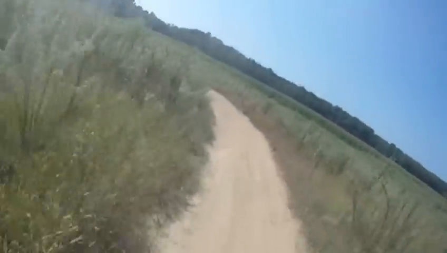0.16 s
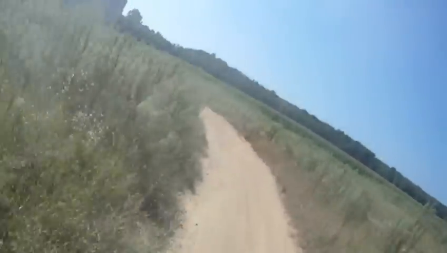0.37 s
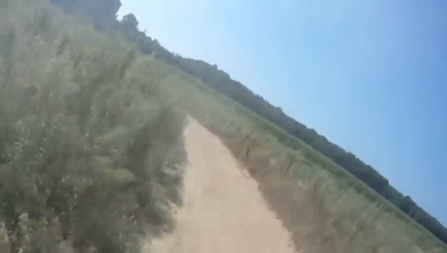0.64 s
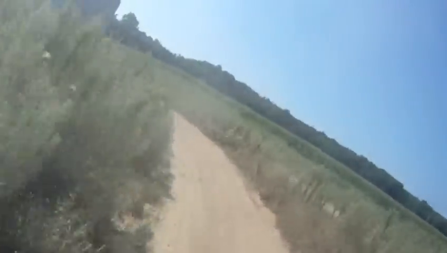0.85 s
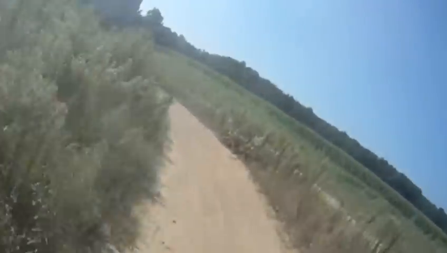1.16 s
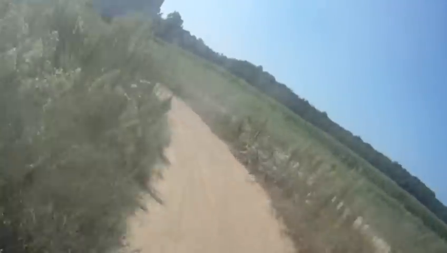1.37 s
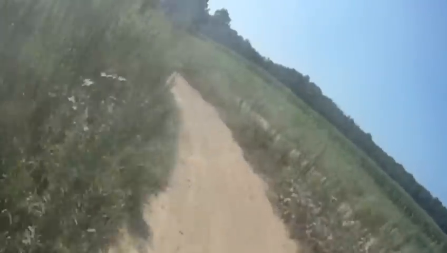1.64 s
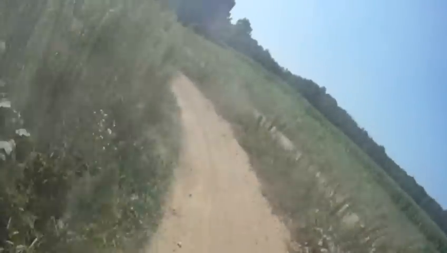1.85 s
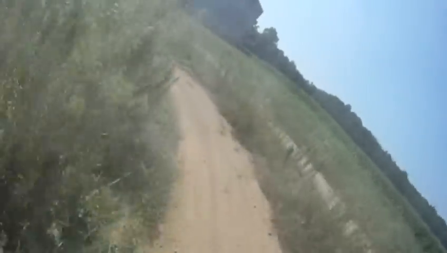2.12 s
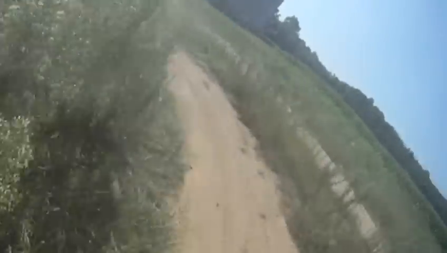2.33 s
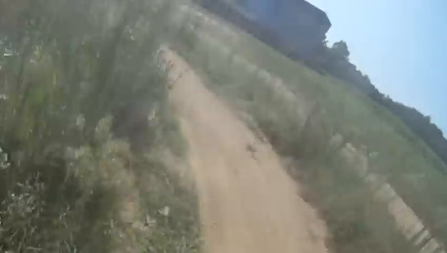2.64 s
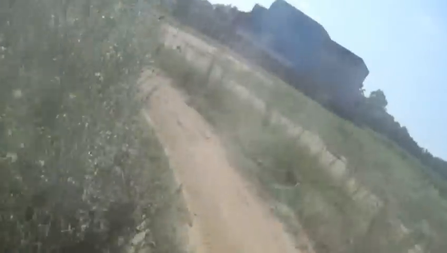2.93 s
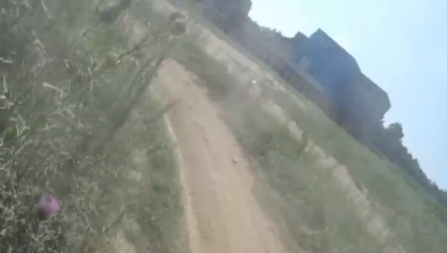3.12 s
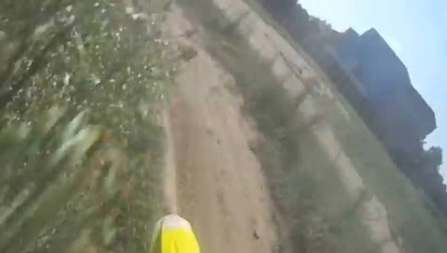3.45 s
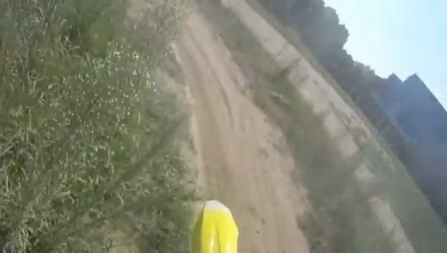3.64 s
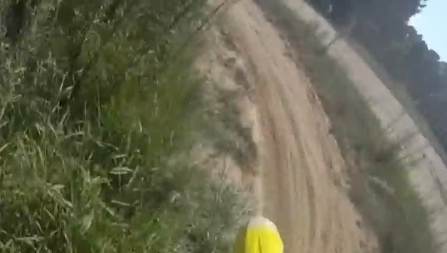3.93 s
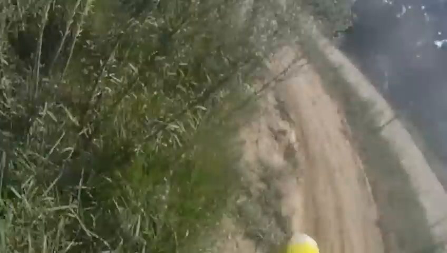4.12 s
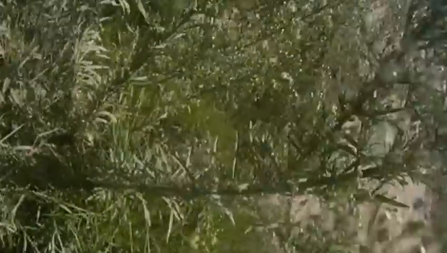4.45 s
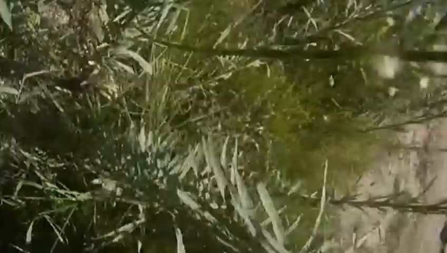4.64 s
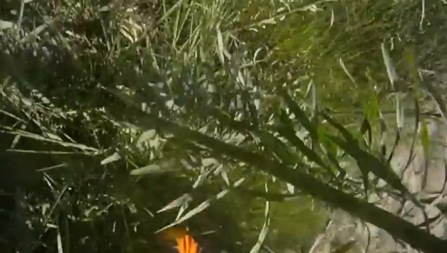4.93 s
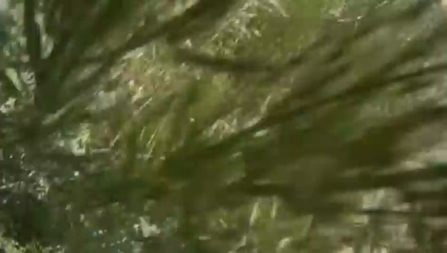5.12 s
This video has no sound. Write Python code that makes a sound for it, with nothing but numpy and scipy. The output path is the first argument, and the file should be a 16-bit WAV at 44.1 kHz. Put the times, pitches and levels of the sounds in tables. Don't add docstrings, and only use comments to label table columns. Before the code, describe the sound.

Boxy wind roar and a dropping single-cylinder engine give way to quiet idling, sparse ticks, then loud clipped cracks and leafy scratching up close.

```python
import sys
import numpy as np
from scipy import signal
from scipy.io import wavfile
from scipy.ndimage import uniform_filter1d

SR = 44100
rng = np.random.default_rng(int(sys.argv[2]) if len(sys.argv) > 2 else 0)


def invert_db(x):
    u = np.asarray(x, float) / 20
    return 10 ** u


def unload_audio(sound):
    columns = np.transpose(np.atleast_2d(sound))
    steps = np.round(np.clip(columns, -1, 1) * 32767)
    wavfile.write(sys.argv[1], SR, steps.astype(np.int16))


N = 232936


def level(x, db):
    return x * invert_db(db) / np.sqrt(np.mean(x ** 2))


def curves(table):
    s, *columns = np.transpose(table)
    return [np.interp(np.arange(N) / SR, s, c) for c in columns]


def band(x, hz, width_hz):
    return signal.lfilter(*signal.iirpeak(hz, hz / width_hz, fs=SR), x)


def steep(x, hz, width_hz):
    return band(band(x, hz, width_hz), hz, width_hz)


def walk(rate):
    k = int(SR / rate)
    held = np.repeat(rng.standard_normal(N // k + 1), k)
    return 1.16 * uniform_filter1d(uniform_filter1d(held, k), k)[:N]


def swells(table, base_db):
    t = np.arange(N) / SR
    power = invert_db(2 * base_db)
    for s, db, half in table:
        power = power + invert_db(2 * db) * np.cos(np.pi / 2 * np.clip((t - s) / half, -1, 1)) ** 4
    return np.sqrt(power)


def add(out, s, piece):
    i = int(s * SR)
    out[i:i + len(piece)] += piece[:N - i]


def case(x, flicker_db, treble=1):
    # (frequency [Hz], width [Hz], level [dB])
    case_modes = [(287, 320, -10), (831, 58, -1), (1078, 103, -0.5), (1370, 170, -6.5), (1640, 97, -6.5),
                  (2056, 336, 5.5), (2490, 330, -6.5), (2690, 102, 2), (3165, 160, -15), (3460, 140, -3),
                  (3627, 510, -13.5), (4340, 390, -17), (5090, 450, -15), (5480, 390, -14.5)]
    out = 0
    for k, (hz, width_hz, db) in enumerate(case_modes):
        gain = (-1) ** k * invert_db(db + flicker_db * walk(25.11))
        out = out + gain * steep(x, hz, 1.98 * width_hz) * (treble if hz > 3000 else 1)
    return out


def engine():
    # (time [s], crank speed [Hz], fourth order level [dB])
    crank = [(0.0, 57.7, -36), (0.146, 58.13, -41), (0.264, 49.53, -34), (0.48, 51.1, -35),
             (0.62, 50.27, -34.5), (0.878, 43.2, -38), (1.036, 46.6, -36), (1.17, 40.4, -37),
             (1.27, 37.8, -37), (1.34, 36, -48), (1.62, 31.07, -50), (2.43, 30.14, -47.5),
             (3.1, 28.96, -51.5), (4.3, 29.84, -61), (5.28, 30.4, -58)]
    # (order [per turn], level [dB])
    rolling_orders = [(1, -34), (2, -3), (3, -7), (4, 1.5), (5, -9), (6, -11), (7, -29), (8, -26), (9, -22),
                      (10, -15), (11, -14.5)]
    # (order [per turn], level [dB])
    idle_orders = [(1, -4), (2, -4), (3, -3), (4, -4), (5, -5), (6, -8), (7, -11), (8, -10), (9, -13),
                   (10, -8), (11, -8)]
    hz, db = curves(crank)
    turns = np.cumsum(hz * (1 + 0.0061 * walk(11))) / SR
    rolling = np.clip((hz - 32) / 6, 0, 1)
    out = 0
    for (k, fast_db), (_, slow_db) in zip(rolling_orders, idle_orders):
        pattern_db = rolling * fast_db + (2 - rolling) * (slow_db + 3)
        gain = invert_db(db + 2 + pattern_db + 1.3 * walk(5.47))
        out = out + gain * np.sin(2 * np.pi * (k * turns + rng.random()))
    return out, turns


def head_wind():
    # (time [s], level [dB])
    wind_curve = [(0.0, -26.5), (0.24, -28), (0.65, -28), (1.01, -29), (1.37, -33.5), (1.8, -39.5),
                  (2.11, -40), (2.43, -43), (2.76, -46), (2.81, -37), (2.93, -42.5), (3.2, -48),
                  (3.5, -45.5), (4.5, -46), (5.28, -45)]
    return curves(wind_curve)[0]


def rush(turns, wind_db):
    shake = 1 + 0.5 * np.exp(-(turns % 1) / 0.067)
    turbulence = shake * invert_db(1.27 * walk(150)) * rng.standard_normal(N)
    air = case(turbulence, flicker_db=0.84, treble=invert_db(0.13 * (wind_db + 56.0)))
    start = np.sqrt(np.mean(air[:SR] ** 2))
    return invert_db(wind_db + 3.5) * air / start


def branches():
    # (time [s], peak [dB], contact [s], ringing [Hz], treble [dB])
    lashes = [(2.779, -4, 0.0077, 2040, -37), (2.784, -4.5, 0.0084, 2040, -40),
              (2.786, -13, 0.004, 3490, -23), (2.786, -24, 0.0076, 1180, -26),
              (3.299, 10.5, .0038, 2104, -27), (3.302, .7, .003, 1600, -21),
              (3.5695, 3.5, 0.0039, 2340, -33), (3.575, -1.5, .004, 2300, -15),
              (3.572, -4, 0.0025, 1963, -16.5), (3.577, 6, 0.0076, 2090, -12),
              (3.579, -5.5, 0.0057, 5130, -23), (3.58, -3.5, 0.0066, 3200, -7),
              (4.588, -19, 0.012, 3750, -12), (4.629, -2.5, .0035, 954.1, -5),
              (4.762, -10, .0047, 2720, -17), (4.786, 8, 0.0026, 2040, -39), (4.786, -2, 0.0032, 3430, -22),
              (5.122, -3, 0.007, 1136, -40), (5.122, 3.5, 0.0054, 1920, -22),
              (5.16, -7.5, .012, 2170, -7.5), (5.173, -17.5, 0.0092, 2730, 8.5),
              (5.181, -9, .004, 1900, -15), (5.1845, 5, .0031, 1810, -13), (5.193, -5.5, 0.0076, 2080, -10)]
    return strikes([(*hit, -29.5) for hit in lashes])


def twigs():
    # (time [s], peak [dB])
    slaps = [(3.314, -7), (3.32, -19), (3.586, -15), (4.602, -6), (4.607, -4), (4.614, -11), (4.622, -9),
             (4.642, -11), (4.657, -11), (4.67, -12), (4.691, -13), (4.75, -18), (4.772, -9), (4.803, -9),
             (4.821, -8), (4.83, 3), (4.846, -13), (4.629, -3.5), (5.207, -14), (5.214, -10.5),
             (5.229, -13), (5.243, -11), (5.26, -2.5), (5.269, -1.5), (5.273, -4)]
    slap_contact = .0042, 2070, -16.5, -30
    return strikes([(*hit, *slap_contact) for hit in slaps])


def stems():
    # (time [s], peak [dB])
    wipes = [
        (2.79, -22),
        (3.322, -16),
        (4.373, -18),
        (4.871, -10),
        (4.91, -19),
        (4.944, -8),
        (4.985, -23),
    ]
    wipe_contact = 0, 2000, -24.5, -35
    return strikes([(*hit, *wipe_contact) for hit in wipes])


def grass_heads():
    # (time [s], peak [dB], ringing [Hz])
    ticks = [(1.95, -26, 2050), (1.962, -27, 2000), (2.04, -27, 1900), (2.052, -25, 2200),
             (2.12, -29, 2000), (2.18, -29, 1950), (3.381, -26, 1900), (4.364, -20.5, 1650),
             (2.821, -23, 1530), (2.84, -25, 1540), (2.924, -30, 1690), (2.999, -23.5, 1370),
             (3.246, -26, 1597), (3.353, -33, 1500), (3.609, -22, 1880), (3.927, -27, 1560),
             (4.054, -26, 2150), (4.186, -30, 1570), (4.247, -20, 1563), (4.426, -27, 1456),
             (4.498, -26.5, 1665), (4.562, -21, 1520)]
    contact_s, treble_db, thud_db = 0.0062, -24.5, -25
    return strikes([(s, db, contact_s, hz, treble_db, thud_db) for s, db, hz in ticks])


def seeds():
    # (time [s], peak [dB])
    pings = [
        (2.687, -36.5),
        (2.957, -35),
        (3.0, -38.5),
        (3.089, -35),
        (3.157, -34.5),
        (3.843, -40),
        (4.11, -27),
        (4.27, -40),
        (4.523, -36),
    ]
    ping_contact = -0.02, 1700, -4.5, -25
    return strikes([(*hit, *ping_contact) for hit in pings])


def strikes(hits):
    out, t = np.zeros(N), np.arange(2048) / SR
    for s, db, contact_s, hz, treble_db, thud_db in hits:
        scrape = rng.standard_normal(2048) * (1 - np.exp(-t / .0006))
        tick = 3.0 * np.exp(-t / .00008)
        push = (scrape + tick) * np.exp(-(t / max(contact_s, .0005)) ** 2)
        ring = steep(steep(push, hz, 1130), hz, 1130)
        body = steep(steep(push, 1240, 1700), 1240, 1700)
        crack = steep(push, 3550, 940) - invert_db(-8.0) * steep(push, 5200, 960)
        thud = steep(push, 300, 640)
        parts = [(ring, 0), (body, -9.0), (crack, treble_db + 11.0), (thud, thud_db - 1.5)]
        add(out, s, sum(invert_db(db + rel_db) * part / np.abs(part).max() for part, rel_db in parts))
    return out


def leaves():
    # (time [s], length [s], first level [dB], last level [dB])
    drags = [(3.311, .016, -21, -22), (3.378, .02, -33, -38), (4.185, .075, -41, -40),
             (4.357, .05, -32, -38), (4.583, 0.024, -35, -13), (4.609, .02, -16, -18),
             (4.641, 0.062, -23.5, -23), (4.703, .075, -32, -12), (4.776, .078, -23, -15),
             (4.856, 0.26, -31, -35.5), (5.099, .028, -35, -21), (5.158, .022, -15, -14),
             (5.188, .034, -13, -15), (5.226, .056, -22, -7)]
    t = np.arange(N) / SR
    gain = np.zeros(N)
    for s, length, first_db, last_db in drags:
        ramp = invert_db(np.interp(t, [s, s + length], [first_db, last_db]))
        gain += ramp * (t >= s) * (t < s + length)
    gain = uniform_filter1d(gain, int(0.0038 * SR))
    sizes = invert_db(2.5 * rng.exponential(size=N) + 2.5 * walk(150))
    grains = (rng.random(N) < 4000 / SR) * rng.standard_normal(N) * sizes
    ring = case(grains, flicker_db=1.5)
    crackle = steep(grains, 4230, 2580)
    return gain * (level(ring, -1.7) + level(crackle, -15.0))


def mount_jolts():
    # (time [s], peak [dB], pitch [Hz])
    bumps = [(.06, -26, 101), (.2, -23, 100), (.37, -25, 98), (1.02, -26, 90), (.49, -31, 27),
             (.955, -20, 29.52), (1.128, -25, 53.2), (1.399, -26, 40.2), (2.01, -26, 31.7),
             (2.829, -17, 48.25), (2.871, -9.5, 84), (2.937, -10.5, 38), (3.314, -17.5, 94.7),
             (3.545, -28, 27.86), (3.804, -21, 34.84), (3.839, -22.5, 48.3), (4.244, -11, 27.05),
             (4.284, -13, 69), (4.68, -21.5, 40.3), (4.769, -19.5, 82), (4.82, -8.5, 109.3),
             (4.927, -26, 106.7), (5.118, -17.5, 89), (5.222, -6, 107), (5.26, -7, 115)]
    return swings([(*bump, .15) for bump in bumps])


def shell_knocks():
    # (time [s], peak [dB], pitch [Hz], t60 [s])
    knocks = [(3.299, -8.5, 650, .014), (4.262, -5.5, 91.3, .09), (3.3, -18, 1100, .03),
              (3.3, -10, 280, 0.014), (3.572, -17, 250, .03), (4.604, -17, 860, 0.048),
              (4.248, -26, 210, 0.033), (4.791, -13, 113.5, 0.043), (5.122, -5.5, 228, .022),
              (5.123, -11, 1050, .02), (5.184, -12, 1050, .02), (4.83, -14, 1050, .015),
              (4.9, -34, 210, 0.245), (5.02, -32, 154, .2), (4.629, -16, 950, .02), (4.7, -33, 620, 0.025)]
    return swings(knocks)


def swings(hits):
    out, t = np.zeros(N), np.arange(SR // 3) / SR
    for s, db, hz, t60 in hits:
        envelope = (1 - np.exp(-t / 0.0018)) * np.exp(-np.log(1000) * t / t60)
        swing = envelope * np.sin(2 * np.pi * hz * t)
        add(out, s, invert_db(db) * swing / np.abs(swing).max())
    return out


def whistles():
    # (time [s], level [dB], frequency [Hz], width [Hz], length [s])
    seam_tones = [
        (0., -24, 2000, 130, .22),
        (0.8, -29.5, 2440, 450, 0.14),
        (0.08, -33.5, 2580, 350, 0.97),
        (.6, -36, 3470, 150, 0.6),
        (.1, -31.5, 1690, 370, 0.72),
        (1.345, -25.5, 2400, 500, .09),
        (1.3, -36, 3450, 200, .13),
    ]
    out, t = np.zeros(N), np.arange(SR) / SR
    for s, db, hz, width_hz, length in seam_tones:
        tone = level(steep(rng.standard_normal(len(t)), hz, width_hz), db)
        rise = t / (.5 * length) + (s == 0)
        fall = (length - t) / (0.35 * length)
        add(out, s, tone * np.clip(np.minimum(rise, fall), 0, 1))
    return out


def brake(wind_db):
    # (middle [s], peak [dB], half length [s])
    grabs = [
        (2.3, -39, .3),
        (2.81, -38.5, 0.16),
        (3.51, -43, 0.094),
        (3.8, -40.5, .1),
        (4.55, -42, .07),
    ]
    scrape = steep(invert_db(1.8 * walk(70)) * rng.standard_normal(N), 1580, 190)
    lever = np.clip((np.arange(N) / SR - 1.826) / 0.38, 0, 1)
    rub = invert_db(wind_db - 8)
    return np.hypot(rub, lever * swells(grabs, -42.5)) * level(scrape, 1.0)


def spring_squeaks():
    # (time [s], peak [dB], frequency [Hz], length [s])
    squeaks = [
        (3.7754, -35, 4180, 0.014),
        (3.819, -38, 3900, 0.015),
        (3.8721, -45, 3980, 0.02),
    ]
    out, t = np.zeros(N), np.arange(SR // 3) / SR
    for s, db, hz, length in squeaks:
        envelope = np.sin(np.pi * np.minimum(t / length, 1)) ** 2
        add(out, s, invert_db(db) * envelope * np.sin(2 * np.pi * hz * t))
    return out


def rattle(turns, over_calm_db):
    shaking = (1 + 1.6 * np.exp(-(turns % 1) / 0.51)) * rng.standard_normal(N)
    parts = band(shaking, 200, 330) + invert_db(15.5) * band(shaking, 910, 460) + invert_db(13.5) * steep(shaking, 1312, 480)
    return invert_db(0.21 * over_calm_db) * level(parts, -47.5 + 2.24)


def buffeting():
    # (middle [s], peak [dB], half length [s])
    gusts = [
        (.68, -38, .35),
        (1.2, -45, .3),
        (1.85, -43, .1),
        (2.92, -39, 0.17),
        (3.3, -39.5, 0.32),
        (3.85, -39, 0.29),
        (4.25, -32, 0.25),
        (4.7, -39, 0.26),
    ]
    eddies = steep(invert_db(1.6 * walk(29)) * rng.standard_normal(N), 34.6, 49)
    return swells(gusts, -43.5) * level(eddies, 1.6)


def mount_hum(over_calm_db):
    # (middle [s], peak [dB], half length [s])
    ruts = [
        (2.88, -33, 0.13),
        (4.46, -39.5, 0.11),
        (4.79, -29, 0.17),
        (5.28, -25, 0.17),
    ]
    hum = steep(rng.standard_normal(N), 101.7, 80)
    return swells(ruts, -46 + 0.59 * over_calm_db) * level(hum, -1.05)


def scene():
    orders, turns = engine()
    wind_db = head_wind()
    over_calm_db = wind_db + 45
    air = rush(turns, wind_db) + whistles() + buffeting()
    brush = branches() + twigs() + stems() + grass_heads() + seeds() + leaves()
    mount = mount_jolts() + shell_knocks() + mount_hum(over_calm_db)
    bike = orders + brake(wind_db) + spring_squeaks() + rattle(turns, over_calm_db)
    return (bike + air + brush + mount)[None]


def band_limit(x):
    return signal.sosfilt(signal.butter(12, 15850, fs=SR, output="sos"), x)


def record(dry):
    overload, duck_db, lag_s, attack_s, release_s = .6, -140, .024, .008, .045
    dry = signal.sosfilt(signal.butter(2, 12, "high", fs=SR, output="sos"), dry)
    over = 1. * (uniform_filter1d(np.abs(dry), 45) > overload)
    over = np.pad(over, ((0, 0), (int(lag_s * SR), 0)))[:, :N]
    for seconds in (attack_s, attack_s, release_s):
        memory = np.exp(-1 / (seconds * SR))
        over = signal.lfilter([1 - memory], [1, -memory], over)
    ducked = dry * invert_db(duck_db * over)
    slow = signal.resample_poly(ducked, 40, 147, axis=1, window=("kaiser", 3.0))
    slow = np.clip(signal.lfilter([.9, .1], 1, slow), -1, 1)
    held = signal.resample_poly(np.repeat(slow, 4, axis=1), 147, 160, axis=1)[:, 1:N + 1]
    lowpass = signal.ellip(8, .1, 35, 15230, fs=SR, output="sos")
    held = signal.sosfiltfilt(lowpass, held).clip(-1.05, 1.05)
    held = np.pad(held, ((0, 0), (0, N - held.shape[1])))
    return band_limit(held)


dry = scene()
out = record(dry)
unload_audio(out)
```